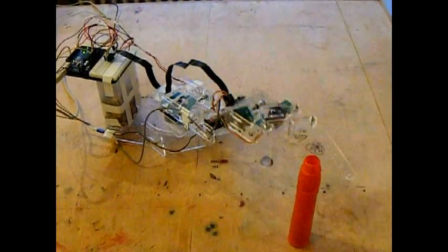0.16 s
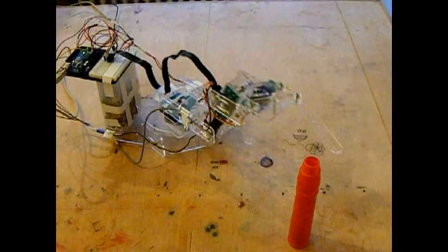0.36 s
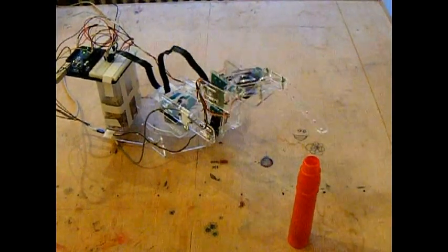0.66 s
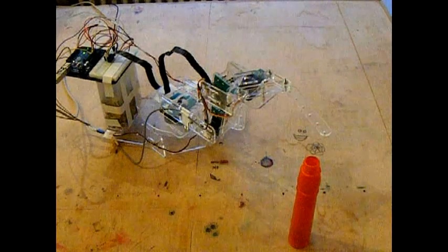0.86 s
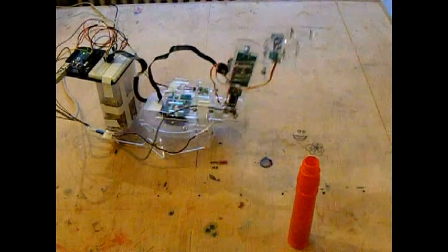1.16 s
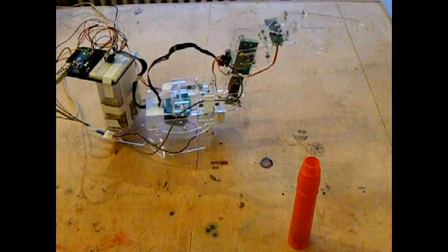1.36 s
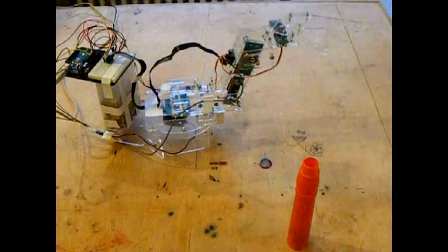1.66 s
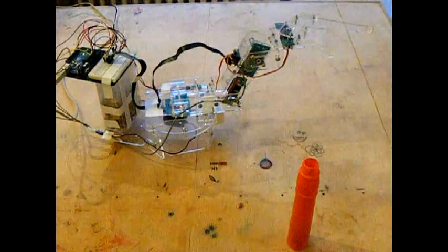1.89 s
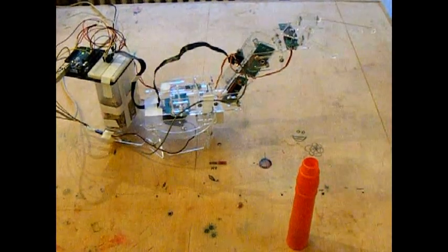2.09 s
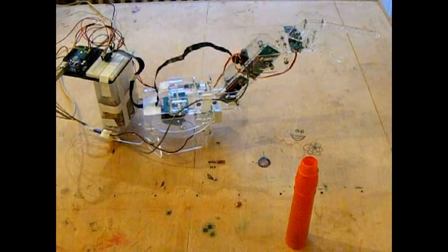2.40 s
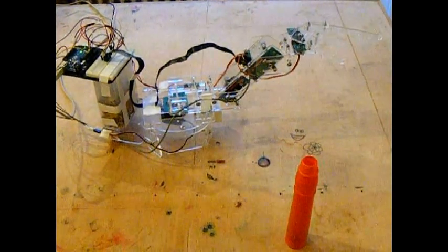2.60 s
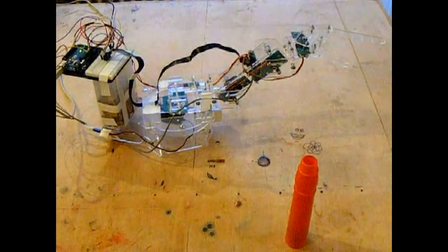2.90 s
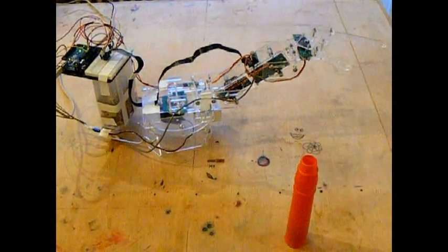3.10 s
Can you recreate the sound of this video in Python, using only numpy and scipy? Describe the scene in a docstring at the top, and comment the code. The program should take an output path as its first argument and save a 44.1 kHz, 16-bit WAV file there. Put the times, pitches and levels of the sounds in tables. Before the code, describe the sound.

Robot arm servos whir roughly in two jerky moves with knocks, then hold with ticking buzz

```python
"""The servos of a clear plastic hobby robot arm grind through two swings on a wooden table: rough noise
through ringing cases, over a table rumble. Shaft tones sink in the first swing; gear tones whine mostly
upward in the second. Knocks ring table modes and rattle plastic, and a short scrape rises in pitch.
A pulsed buzz runs throughout and grows as the servos hold their load, with single twitches of tone and crack.
A small room adds shaped noise, steady hum and a diffuse tail; a narrow band limits it all."""
import sys
import numpy as np
from scipy import signal
from scipy.fft import rfft, irfft, next_fast_len
from scipy.io import wavfile
from scipy.ndimage import uniform_filter1d, map_coordinates

SR = 44100
rng = np.random.default_rng(int(sys.argv[2]) if len(sys.argv) > 2 else 0)


def digitize_waveform(pressure):
    """Quantize a signal to 16-bit integers and store it at the path in sys.argv[1].

    Rows of a 2-D input are taken as channels; values are limited to [-1, 1].
    """
    field = np.atleast_2d(pressure).T
    bounded = np.clip(field, -1, 1)
    quanta = np.round(bounded * 32767).astype(np.int16)
    wavfile.write(sys.argv[1], SR, quanta)


N = 143325  # length [samples]


def amp(db):
    """Level in dB to linear gain."""
    return 10 ** (np.asarray(db) / 20)


def unit(x):
    """Scale to an rms of one."""
    return x / np.sqrt(np.mean(x ** 2) + 1e-20)


def curves(rows):
    """One value per sample for each column after the time."""
    s, *cols = np.transpose(rows)
    return [np.interp(np.arange(N) / SR, s, c) for c in cols]


def wobble(rate):
    """A smooth random curve, rate knots a second."""
    knots = rng.standard_normal(int(N * rate / SR) + 4)
    return map_coordinates(knots, [np.arange(N) * rate / SR])


def filtered(x, response):
    """Shape the spectrum of x by a complex response of frequency."""
    m = next_fast_len(N + SR // 2)
    return irfft(rfft(x, m) * response(np.fft.rfftfreq(m, 1 / SR)), m)[:N]


def colour(points):
    """Response through (frequency [Hz], level [dB]) points on a log axis."""
    f, db = np.transpose(points)
    return lambda hz: amp(np.interp(np.log(hz + 1), np.log(f + 1), db))


def rings(peaks):
    """Causal response of a set of resonances, alternating in sign."""
    def response(f):
        return sum((-1) ** k * amp(db) * 1j * f * width / (centre ** 2 - f * f + 1j * f * width)
                   for k, (centre, width, db) in enumerate(peaks))
    return response


def add(track, s, sound):
    """Mix a sound in at a time."""
    part = track[round(s * SR):][:len(sound)]
    part += sound[:len(part)]


def gate(start, end, fade):
    """On between two times, with linear fades inside them."""
    t = np.arange(N) / SR
    return np.clip(np.minimum(t - start, end - t) / fade, 0, 1)


def orders(track, multiples, waver, flutter_db):
    """Rotation tones: fluttering multiples of one moving, wavering rate."""
    hz, level_db = curves(track)
    phase = 2 * np.pi * np.cumsum(hz * (1 + waver * wobble(150))) / SR
    tones = sum(amp(db + flutter_db * wobble(70)) * np.sin(k * phase) for k, db in multiples)
    return gate(track[0][0] - .015, track[-1][0], .015) * amp(level_db) * tones


# Drive effort before the closing fade:
# (time [s], gear grind level [dB], table rumble level [dB], case rings relative to the grind [dB])
DRIVE_EFFORT = [(0, -37, -47, -4), (.22, -36, -42.5, -1), (.52, -35, -55, -12.5), (.56, -34, -38.5, -6.5),
                (.6, -41, -42, -4), (.664, -47, -65, 1), (.72, -53, -56, -2), (.89, -53.5, -69, -9),
                (.965, -38, -48, -10.5), (1.05, -40, -45.5, -7.5), (1.12, -40.5, -48, -15),
                (1.16, -35, -52, -22), (1.21, -33, -47, -16.5), (1.28, -37.5, -41.5, -19),
                (1.36, -32.5, -37.5, -7.5), (1.45, -39.5, -42, -12), (1.6, -61, -67, -11)]
# Grind colour: (frequency [Hz], relative level [dB])
GRIND_COLOUR = [(530, -53), (900, -28.5), (1380, -13), (1720, -8.5), (1960, -1), (2370, -10.5), (2980, -3),
                (3920, -23), (5010, -23), (5570, -37), (7240, -56), (12300, -120)]
# Narrow rings of the servo cases: (frequency [Hz], width [Hz], relative level [dB])
SERVO_CASE_RINGS = [(2150, 240, -7.5), (2565, 30, 4.5), (2690, 22, -2), (2886, 46, 4.5), (4460, 12, -28.5),
                    (4360, 60, -22), (4790, 67, -14.5)]
# Table resonances under the motor, for each of two passes: (frequency [Hz], width [Hz], relative level [dB])
TABLE_RUMBLE = [(50, 44, -9), (126, 41, -2), (185.8, 27, 0.5), (293, 80, -4)]
GRIND_END_S, GRIND_FADE_S = 1.653, .47
LUMPS_PER_S, LUMP_DB = 300, 1.5  # unevenness of the tooth contacts


def grind():
    """Uneven tooth contacts excite the servo cases; the motor shakes the table."""
    grind_db, rumble_db, ring_db = curves(DRIVE_EFFORT)

    def teeth():
        """Lumpy noise of gear teeth meeting."""
        return rng.standard_normal(N) * amp(LUMP_DB * wobble(LUMPS_PER_S))

    body = unit(filtered(teeth(), colour(GRIND_COLOUR)))
    case = unit(filtered(teeth(), rings(SERVO_CASE_RINGS)))
    once_rung = filtered(rng.standard_normal(N), rings(TABLE_RUMBLE))
    rumble = unit(filtered(once_rung, rings(TABLE_RUMBLE)))
    drive = amp(grind_db) * (body + amp(ring_db) * case) + amp(rumble_db) * rumble
    return gate(-1, GRIND_END_S, GRIND_FADE_S) * drive


# First swing, slowing under load: (time [s], shaft rate [Hz], level [dB])
SHAFT_SWING = [(0, 200.6, -46.5), (.1, 197.1, -45), (.2, 197.8, -44), (.3, 198.6, -47), (.37, 185.9, -44),
               (.5, 180.2, -47.5), (.62, 177.4, -49.5)]
# Shaft tones: (multiple of the shaft rate, relative level [dB])
SHAFT_TONES = [(.9, 0), (10.3, -7.5), (12.2, -5.5), (13.1, 0.5), (13.7, 0), (14.6, 6), (15.5, 1),
               (16.3, -3.5), (24.4, -15.5)]


def shaft_whine():
    """The motor shaft sings at multiples of its rate during the first swing."""
    return orders(SHAFT_SWING, SHAFT_TONES, waver=.006, flutter_db=4)


# Holding effort: (time [s], gear chatter level [dB], clean kick level [dB])
HOLD_EFFORT = [(0, -49.5, -56), (.7, -47.5, -60.5), (1.4, -48, -50), (1.8, -46.5, -49.5),
               (2.05, -50, -63.5), (2.3, -48, -55.5), (2.5, -48, -47.5), (2.66, -44, -44.5),
               (2.9, -44, -43.5), (3.05, -44, -44), (3.25, -43.5, -43)]
# Case rings of the chatter: (frequency [Hz], width [Hz], relative level [dB])
CHATTER_RINGS = [(1795, 195, 4.5), (2320, 290, 2.5), (2838, 252, 2), (2940, 33, -6.5), (3570, 300, -20.5),
                 (5050, 520, -21)]
# Case rings of the kicks, for each of two passes: (frequency [Hz], width [Hz], relative level [dB])
CASE_KICK_RINGS = [(1805, 130, 0), (2305, 90, -2), (2480, 90, -2), (2705, 70, 0), (2880, 100, 0),
                   (3080, 90, -6), (3550, 130, -6)]
FRAME_HZ, FRAME_START_S, FRAMES = 50.13, .0045, 163
BUZZ_SCATTER_DB, BUZZ_BURST_S = .8, .04  # strength spread; time for a burst to decay to 1/e


def buzz():
    """A motor kick once per control frame rings the case, trailed by a burst of gear chatter."""
    at = np.round((FRAME_START_S + np.arange(FRAMES) / FRAME_HZ) * SR).astype(int)
    pulses = np.zeros(N)
    pulses[at] = amp(BUZZ_SCATTER_DB * rng.standard_normal(len(at)))
    once_rung = filtered(pulses, rings(CASE_KICK_RINGS))
    kicks = filtered(once_rung, rings(CASE_KICK_RINGS))
    decay = np.exp(-np.arange(SR // 16) / SR / BUZZ_BURST_S)
    bursts = signal.fftconvolve(pulses, decay)[:N]
    chatter = filtered(bursts * rng.standard_normal(N), rings(CHATTER_RINGS))
    chatter_db, kick_db = curves(HOLD_EFFORT)
    return amp(chatter_db) * unit(chatter) + amp(kick_db) * unit(kicks)


# Colour of the room floor: (frequency [Hz], relative level [dB])
AIR_COLOUR = [(15, -54.5), (25, -15.5), (85, -7.5), (119, -10), (196, -3), (269, -5.5), (308, -6.5),
              (554, -8.5), (607, -10.5), (680, -10), (1500, -17.5), (1680, -16), (1880, -12.5), (2890, -15),
              (5570, -42), (7240, -84.5), (12300, -120)]
# Steady tones, before their slight wobble: (frequency [Hz], rms level [dB])
HUM_TONES = [(199, -56), (1696, -54.5)]
AIR_DB = -41.5  # rms level of the room noise


def air():
    """Room noise in faint patches of time and pitch, with slightly unsteady tones."""
    cells = signal.stft(rng.standard_normal(N), nperseg=512)[2]
    across_pitch = uniform_filter1d(rng.standard_normal(cells.shape), 6, 0)
    patches = unit(uniform_filter1d(across_pitch, 10, 1))
    noise = signal.istft(cells * amp(.8 * patches), nperseg=512)[1][:N]
    t = np.arange(N) / SR
    hum = sum(np.sqrt(2) * amp(db + 1.7 * wobble(8)) * np.sin(2 * np.pi * hz * t + 1.1 * wobble(4.5))
              for hz, db in HUM_TONES)
    return amp(AIR_DB) * unit(filtered(noise, colour(AIR_COLOUR))) + hum


SCRAPE_S, SCRAPE_HZ, SCRAPE_RISE_HZ_PER_S = .32, 1050, 20000
SCRAPE_DB, SCRAPE_T60_S = -36.5, .3


def scrape():
    """A short rough scrape: a rising tone shaken by smoothed noise."""
    out, t = np.zeros(N), np.arange(SR // 12) / SR
    rough = unit(uniform_filter1d(rng.standard_normal(len(t)), size=36))
    tone = np.sin(2 * np.pi * (SCRAPE_HZ + SCRAPE_RISE_HZ_PER_S * t / 2) * t)
    add(out, SCRAPE_S, amp(SCRAPE_DB - 60 * t / SCRAPE_T60_S) * (.5 + rough) * tone)
    return out


# Jolts of the arm: (time [s], blow level [dB], rattle relative to the blow [dB],
# pitch the blow favours [Hz], ring length over the free table's [ratio])
JOLTS = [(.544, -19.5, 1.5, 302, .6), (.562, -17, -1, 460, 0.83), (.585, -20, -2, 169, .8),
         (.962, -32, 10, 1200, 0.55), (.974, -22, 3, 360, 0.36), (1.002, -18.5, -2, 380, 0.6),
         (1.014, -18, -2, 133, 0.81), (1.055, -27.5, 3, 400, 0.59), (1.149, -17, 6, 330, 1.2),
         (1.162, -17, 4, 720, 1.7), (1.205, -23, 2, 320, 1.3), (1.266, -24, 5, 1050, .9),
         (1.278, -18, -6, 202, 1.16), (1.305, -24, 1.5, 317, 0.62)]
# Modes of the free table: (frequency [Hz], relative level [dB], time to fall 60 dB [s])
TABLE_MODES = [(130, -2, .25), (195, -1, .28), (265, -5, .14), (320, -1, .26), (375, -5, .14),
               (450, -4, .16), (600, -3, .12), (690, -3, .24), (870, -4, .16), (1040, -5, .1),
               (1170, -4, .16), (1400, -4, .09)]
# Colour of the plastic rattle: (frequency [Hz], level [dB])
RATTLE_COLOUR = [(150, -13.5), (500, 2.5), (1500, 4), (2500, 6), (3500, -33), (5500, -37.5)]
RATTLE_T60_S, RATTLE_DB = .15, -7  # RATTLE_DB trims every rattle
FAVOUR_DB = 10  # loss of a mode one octave from the favoured pitch


def knocks():
    """Each jolt rings the table modes near its own pitch and rattles the plastic frame."""
    wood, plastic, t = np.zeros(N), np.zeros(N), np.arange(SR // 3) / SR
    for s, db, rattle_db, favoured, length in JOLTS:
        ring = np.zeros(len(t))
        for hz, level, t60 in TABLE_MODES:
            detuning_loss = FAVOUR_DB * np.log2(hz / favoured) ** 2
            mode_db = level - detuning_loss + rng.normal(0, 1.5) - 60 * t / t60 / length
            mode_hz = hz * rng.normal(1, .0085)
            ring += amp(mode_db) * np.sin(2 * np.pi * mode_hz * t + rng.uniform(0, 2 * np.pi))
        add(wood, s, amp(db - 12) * ring * (1 - np.exp(-t / .0011)))
        rattle_envelope = amp(db + rattle_db + RATTLE_DB - 60 * t / RATTLE_T60_S)
        add(plastic, s, rattle_envelope * rng.standard_normal(len(t)))
    return wood + filtered(plastic, colour(RATTLE_COLOUR))


# Second swing, speeding up: (time [s], tooth rate [Hz], level [dB])
GEAR_SWING = [(.94, 900, -48), (.97, 940, -42), (1.02, 975, -47), (1.062, 955, -48), (1.075, 975, -35),
              (1.1, 1030, -35), (1.13, 1048, -31), (1.15, 1090, -33), (1.172, 1138, -34),
              (1.225, 1135, -38), (1.255, 1132, -31), (1.292, 1160, -36), (1.308, 1170, -46),
              (1.35, 1160, -50)]
# Gear tones: (multiple of the tooth rate, relative level [dB])
GEAR_TONES = [(2, 5), (2.1, -5), (3, -2.5), (2.91, -1.5), (3.09, -5), (4, 1), (4.09, -8.5), (5, -11)]
# Colour the housing gives the whine: (frequency [Hz], level [dB])
HOUSING_COLOUR = [(1800, -7.5), (2070, 2.5), (2280, 0), (2900, 4), (3250, 0), (3550, -6.5), (3800, -31.5),
                  (4300, -31), (4500, -13), (5200, -11.5), (5700, -27.5)]


def gear_whine():
    """Meshing teeth whine at multiples of their rate through the housing in the second swing."""
    gears = orders(GEAR_SWING, GEAR_TONES, waver=.012, flutter_db=2.2)
    return filtered(gears, colour(HOUSING_COLOUR))


# Single corrections: (time [s], level [dB], pitch [Hz], crack relative to the ring [dB])
TWITCH_TICKS = [(1.4227, -26, 2094, -2), (1.6521, -21, 2080, 0), (1.7724, -22, 2200, 0),
                (1.8603, -31, 2080, 0), (1.8716, -21, 2180, 0), (1.9565, -27, 2100, 0),
                (1.9729, -23, 1990, 0), (2.1575, -25, 1900, 7), (2.1734, -32, 2210, 5),
                (2.3915, -25, 2270, 0), (2.7556, -22, 2120, 2), (2.9716, -25, 2040, 0),
                (3.0724, -21, 2140, 3), (3.1557, -24, 2250, 3), (3.1755, -25, 2200, 0)]
TWITCH_T60_S = .02  # fall of the whole tick
CRACK_T60_S = .02  # extra fall of the crack within it


def twitches():
    """A second servo corrects itself with single short ticks of ringing tones and noisy crack."""
    out, t = np.zeros(N), np.arange(SR // 20) / SR
    for s, db, hz, crack_db in TWITCH_TICKS:
        ring = sum(gain * np.sin(2 * np.pi * ratio * hz * t)
                   for ratio, gain in [(1, 1), (.8, .28), (1.3, .24)])
        crack = amp(crack_db - 60 * t / CRACK_T60_S) * rng.standard_normal(len(t))
        envelope = amp(db - 60 * t / TWITCH_T60_S) * (1 - np.exp(-t / .0005))
        add(out, s, envelope * (ring + crack))
    return filtered(out, colour([(400, -25), (900, -3), (2500, 0), (3700, -7), (5000, -30)]))


ROOM_T60_S, ROOM_DB = .3, -9


def room(x):
    """A short diffuse tail of decaying noise, starting after a 4 ms gap."""
    t = np.arange(SR // 2) / SR
    tail = rng.standard_normal(len(t)) * amp(-60 * t / ROOM_T60_S) * (t > .004)
    return signal.fftconvolve(x, tail / np.linalg.norm(tail))[:N]


def scene():
    """The arm and its room tail over the room's own noise."""
    arm = grind() + shaft_whine() + buzz() + scrape() + knocks() + gear_whine() + twitches()
    return (arm + amp(ROOM_DB) * room(arm) + air())[None]


# Leak of the mirrored band: (frequency [Hz], level [dB])
MIRROR_LEAK = [(5700, -27), (6500, -38), (7500, -41), (8000, -47), (9000, -59), (9800, -70), (10500, -120)]
SAMPLE_HZ, BAND_HZ, TOP_HZ = 11025, 5722, 15700  # converter rate, band edge, upper limit of the output
HISS_DB = -91  # before the upper limit
OFFSET = -.0093  # constant, in full scale


def record(dry):
    """A slow converter: narrow band, a faint mirror image above it, faint hiss, a small constant offset."""
    band = filtered(dry[0], lambda hz: hz < BAND_HZ)
    # multiplying by the converter rate folds the band over to its mirrored place
    mirrored = 2 * band * np.cos(2 * np.pi * SAMPLE_HZ * np.arange(N) / SR)
    image = filtered(mirrored, lambda hz: colour(MIRROR_LEAK)(hz) * (hz > BAND_HZ))
    hiss = amp(HISS_DB) * rng.standard_normal(N)
    return filtered(band + image + hiss, lambda hz: hz < TOP_HZ)[None] + OFFSET


dry = scene()
out = record(dry)
digitize_waveform(out)
```